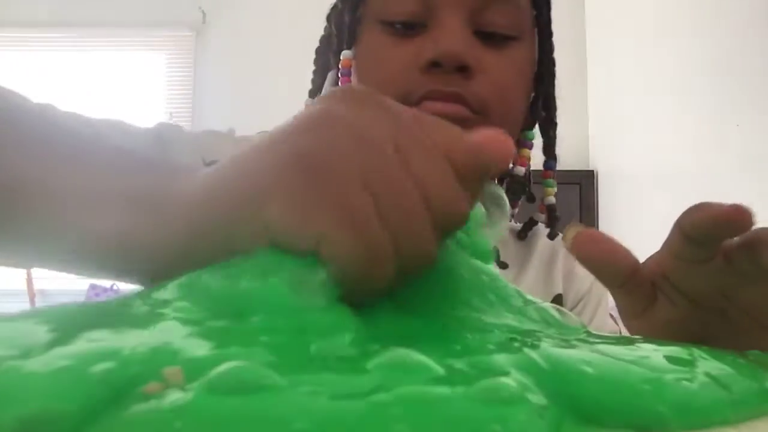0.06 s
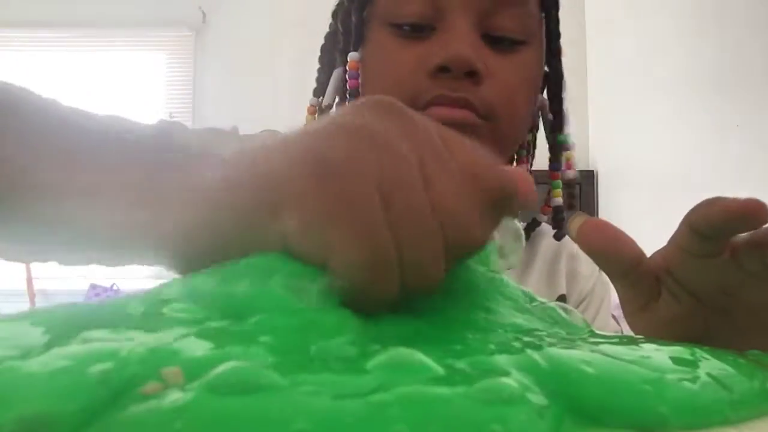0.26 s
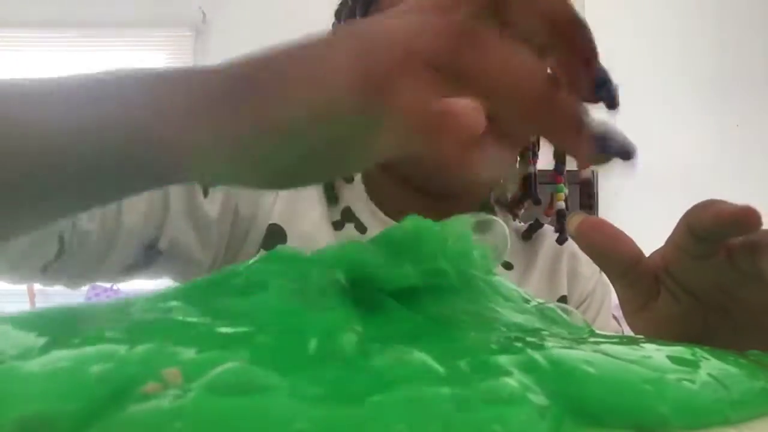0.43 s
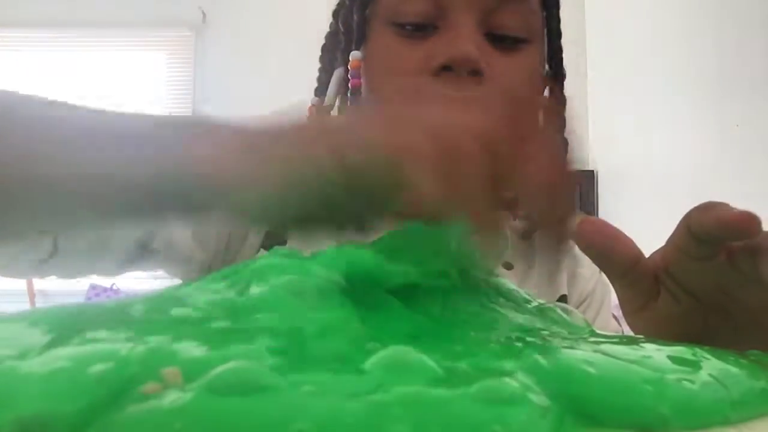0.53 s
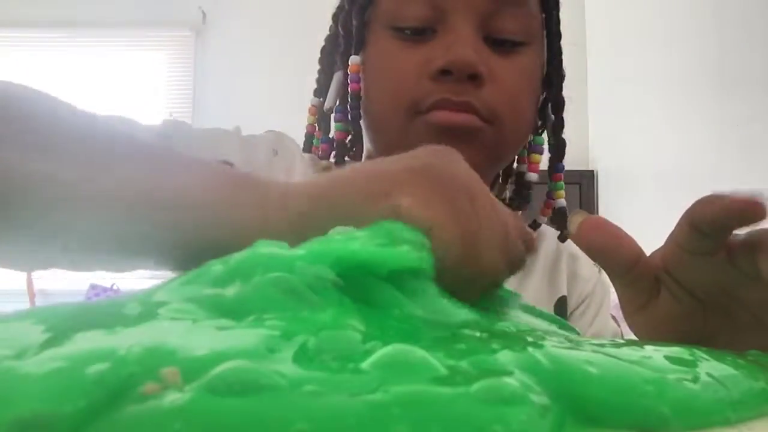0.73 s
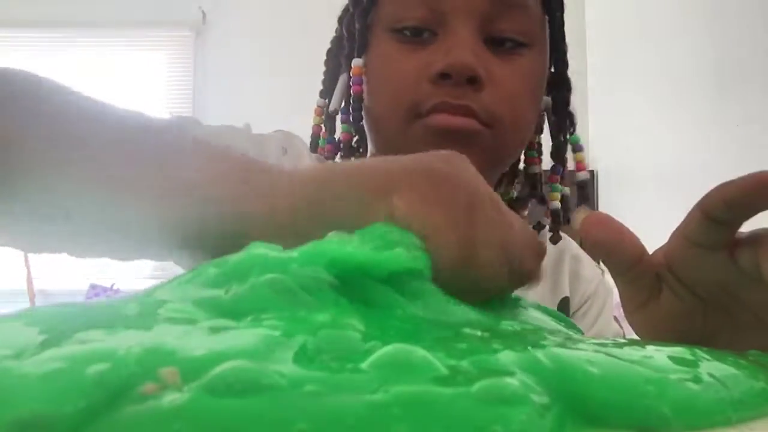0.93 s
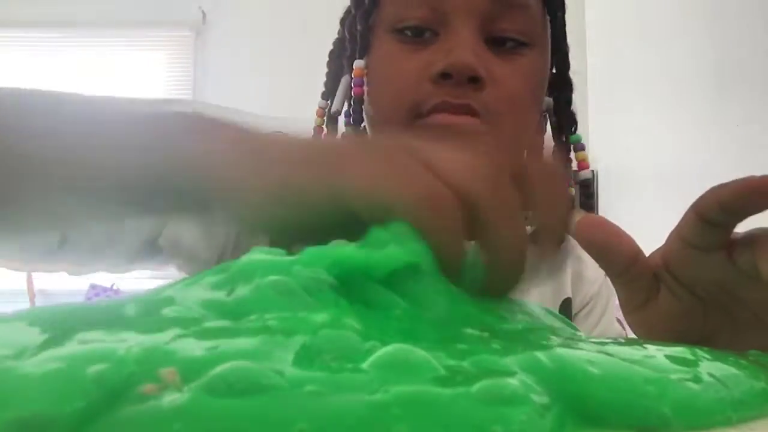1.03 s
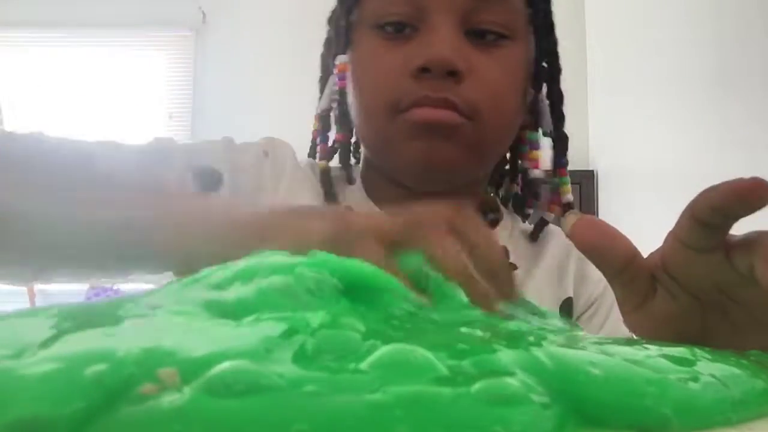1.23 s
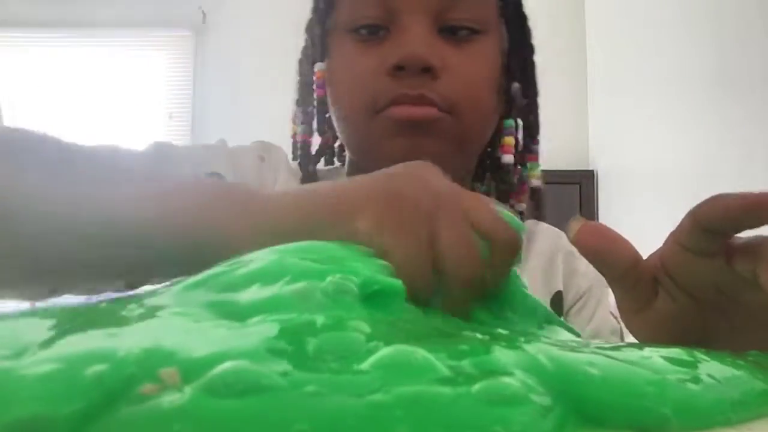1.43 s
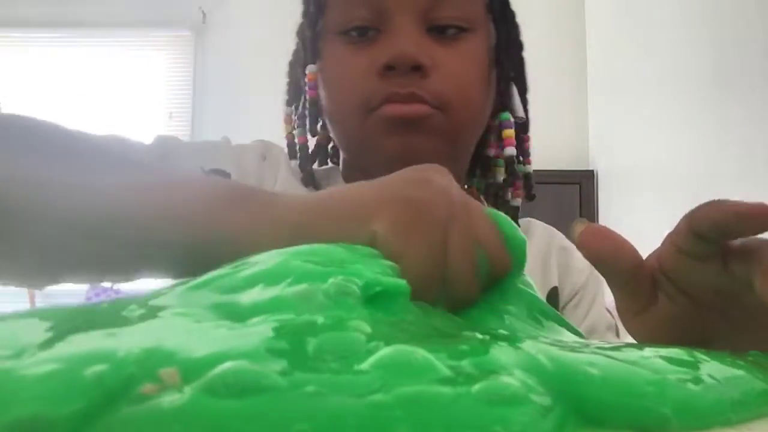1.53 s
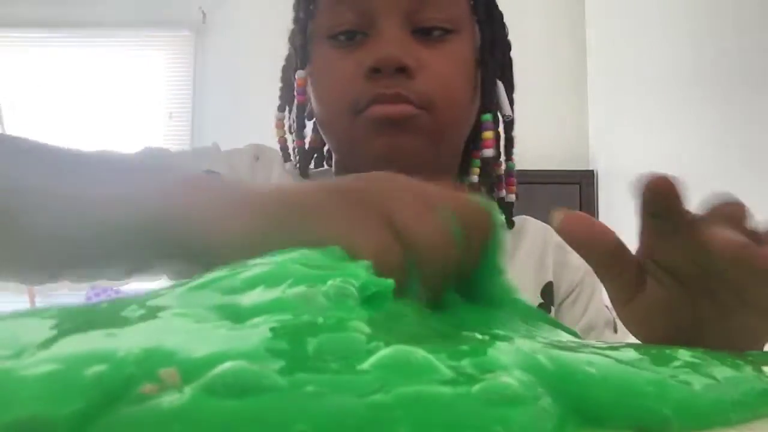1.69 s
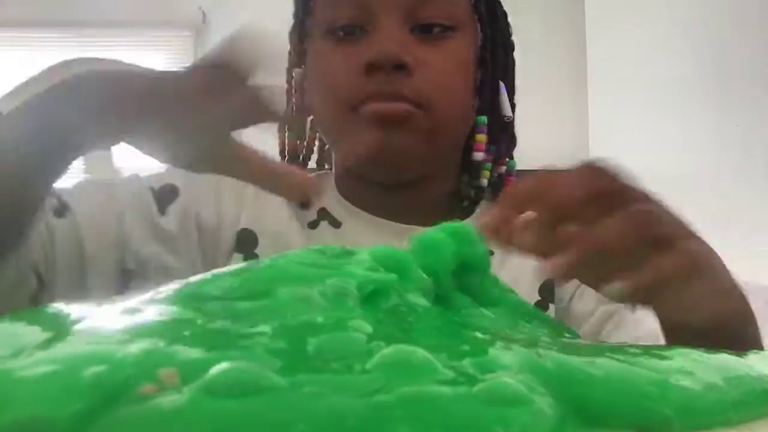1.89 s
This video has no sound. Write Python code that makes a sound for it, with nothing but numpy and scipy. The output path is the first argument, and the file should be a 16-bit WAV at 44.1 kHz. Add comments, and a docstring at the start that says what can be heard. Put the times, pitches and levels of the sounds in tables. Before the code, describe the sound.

Close to the microphone in a small room, a hand kneads thick slime; sharp wet pops come in uneven clusters, loudest early and once later, with small sticky crackles between and faint rumble and hiss behind.

```python
"""Air pockets burst in a heap of thick slime worked by a hand, close to the microphone in a small room.
Each burst is a noisy click, the skin's snap, with a brief sagging sine, the cavity's ring.
Large pockets gulp as low decaying sines, air squeaks through narrow gaps as gliding sines,
and the sticky surface crackles under the fingers as swells of tiny decaying grains.
Behind them the room answers with noise tails, over filtered-noise rumble and hiss and a wavering low hum."""
import sys
import numpy as np
from scipy import signal
from scipy.fft import rfft, irfft, next_fast_len
from scipy.io import wavfile
from scipy.ndimage import map_coordinates

SR = 44100
rng = np.random.default_rng(int(sys.argv[2]) if len(sys.argv) > 2 else 0)


def inscribe(sig):
    """Save sig as 16-bit PCM at rate SR to the path in sys.argv[1].

    A 1-D sig is mono; a 2-D sig holds one channel per row.
    Samples are clipped to [-1, 1] before scaling.
    """
    pcm = np.round(np.clip(np.atleast_2d(sig).T, -1, 1) * 32767)
    wavfile.write(sys.argv[1], SR, pcm.astype(np.int16))


N = 85995  # samples

# bursting air pockets: (time [s], cavity pitch at onset [Hz], ring level [dB], ring t60 [s],
#                        snap level [dB], snap centre [Hz], room feed [dB])
AIR_POCKETS = [ (0.1559, 3550, -21.5, 0.004, -32.5, 2900, -15),
               (0.1576, 910, -30.5, 0.019, -29.5, 1530, -6), (0.2145, 2490, -14, .016, -19, 5300, -17.5),
               (0.2162, 1260, -9.5, 0.0232, -17, 1510, -11), (0.221, 840, -9.5, 0.0088, -19.5, 1180, -10.5),
               (.2610, 2370, -1, 0.0085, -5.5, 4970, -0.5), (.2613, 920, -8, 0.016, -5, 1400, 0),
               (.2622, 3250, -7, .007, -14, 5500, -1), (0.4411, 5030, -36, 0.0012, -32, 8000, -1),
               (0.4562, 4200, -4, 0.0022, -7, 7150, -18.5), (0.4587, 2700, -8, .005, -14, 2600, -8),
               (0.46, 1520, -15.5, 0.0052, -39, 1460, -6.5), (.6930, 2200, -46, 0.0043, -47, 5000, -14),
               (0.8068, 4460, -12.5, 0.0047, -15.5, 7500, -6),
               (0.8132, 6400, -10.5, 0.0029, -30, 8000, -20),
               (0.8265, 3520, -16.5, 0.0031, -14.5, 1580, -3), (0.829, 1020, -7, 0.0051, -7.5, 2520, -9.5),
               (0.8333, 750, -16.5, 0.014, -14.5, 1440, -31), (.8457, 8000, -20, 0.0022, -23, 6060, 1.5),
               (0.9421, 3550, -8, 0.0033, -10.5, 7550, -16.5),
               (0.9429, 1400, -16, 0.0076, -10.5, 2520, -18), (0.9453, 6070, -11.5, 0.0082, -26, 4470, -20),
               (1.1234, 3490, -31, 0.0059, -30.5, 4000, 6), (1.1562, 6500, -31, .004, -45, 4500, -10),
               (1.1624, 3710, -32, 0.0083, -56, 3060, -4), (1.1732, 6230, -30, 0.015, -25.5, 3340, -30),
               (1.2067, 4500, -32.5, 0.0046, -33, 3950, -12), (1.3408, 2250, -26, 0.011, -32.5, 3800, -23),
               (1.372, 1100, -25, 0.014, -25, 2600, -18.5), (1.4543, 1000, -31, .006, -27, 3500, -10),
               (1.4542, 9500, -22, 0.0028, -16.5, 6400, -12), (1.4716, 2624, -21.5, 0.0017, -40, 3520, -23),
               (1.4831, 1900, -28.5, 0.00383, -50, 2500, -28), (1.4875, 3200, -24, 0.0039, -40, 4000, -18),
               (1.5186, 3640, -21, 0.0039, -47, 3970, -10), (1.5225, 4040, -14, 0.0037, -40.5, 4470, -21),
               (1.5439, 2500, -30, 0.0034, -32, 5000, -17), (1.575, 2070, -31.5, 0.011, -32.5, 1520, -1),
               (1.5779, 3830, -19.5, 0.0046, -23.5, 2780, -28), (1.6155, 4450, -23, 0.0035, -44, 5000, -23),
               (1.6386, 2300, -18, .018, -21.5, 3800, -2.5), (1.6420, 2250, -15.5, 0.0093, -7, 2867, -14.5),
               (1.6438, 625, -26, 0.0224, -16.5, 3700, -5.5), (1.6458, 3740, -0.5, .0017, -17, 4300, -13),
               (1.6781, 11800, -8, 0.0016, -2, 9400, -7.5),
               (1.8280, 4350, -22.5, 0.0042, -29.5, 5300, -9.5), (1.8345, 850, -40, 0.019, -34, 2030, -6),
               (1.8493, 4300, -30, .004, -36, 5000, -4), (1.8677, 3140, -32, .007, -36, 5000, -12),
               (1.8842, 1300, -38, 0.011, -39, 2030, -8), (1.8927, 4700, -28.5, 0.0035, -37.5, 3970, -14),
               (1.9185, 1380, -31, 0.011, -29, 4470, -16), (1.9360, 4300, -31.5, 0.0061, -48, 3500, -22)]
SAG_OCT = 0.31  # pitch drop over one ring
RING_RISE_CYCLES = 0.11  # time constant of the ring's onset
SPATTER_DB, SPATTER_T60_S = 0.5, 0.011  # the torn skin flutters after the snap
# harder snaps spread over a wider band: width at 0 dB and its change per dB
SNAP_WIDTH_OCT, SNAP_WIDTH_OCT_PER_DB, SNAP_SKIRT_DB = 1.1, .015, -40
POP_LOW_CUT_HZ = 270  # pockets this small radiate little bass

# dull gulps of large pockets and finger pushes: (time [s], pitch [Hz], level [dB], t60 [s])
LARGE_POCKETS = [(.221, 396, -24, 0.069), (0.462, 461, -36, 0.032), (0.829, 402, -22, 0.063),
                 (0.8314, 990, -22, 0.046), (.8335, 729, -22.5, 0.028), (1.382, 248.5, -38.5, 0.058),
                 (1.488, 463, -34, .03), (1.496, 221.8, -41.5, .06), (1.641, 552, -29, .035),
                 (1.644, 1080, -27, .025), (1.679, 85, -30, 0.073), (1.914, 250, -42.5, 0.055)]
GULP_ATTACK_S = 0.001

# air squeaking through gaps: (time [s], length [s], start pitch [Hz], end pitch [Hz], level [dB])
AIR_GAPS = [(.192, 0.0291, 1610, 1510, -39.5), (0.8361, 0.0045, 3500, 4577, -21.5),
            (0.838, 0.017, 3540, 4870, -26), (0.852, 0.0087, 5410, 6400, -25),
            (0.86, .014, 5980, 6190, -28), (0.876, 0.0062, 6900, 7700, -36.5),
            (0.967, 0.0061, 10300, 9970, -50), (0.949, 0.01, 3040, 2880, -34.5),
            (0.954, 0.0058, 10170, 8900, -35.5), (1.13, 0.02, 1770, 1316, -37)]
SQUEAK_WAVER, SQUEAK_WAVER_HZ = .03, 400  # fraction of pitch, random points per second

# sticky finger movements: (time [s], length [s], rms level [dB], centre [Hz])
FINGER_SMEARS = [(.16, 0.1, -53.5, 2470), (.465, 0.037, -42.5, 3120), (0.836, 0.059, -44, 4000),
                 (.948, .014, -38, 4940), (1.11, 0.074, -44.5, 3260), (1.316, 0.068, -54.5, 3160),
                 (1.375, 0.048, -52, 300), (1.459, 0.058, -50, 800), (1.485, .04, -50, 260),
                 (1.534, .1, -64.5, 3000), (1.646, 0.046, -43.5, 1290), (1.665, 0.026, -38.5, 3940),
                 (1.828, 0.061, -58, 4000), (1.868, .1, -49, 3300), (1.875, .075, -53, 400)]
GRAINS_PER_S, GRAIN_CYCLES = 2600, 9.2  # density, cycles per 60 dB decay
GRAIN_SPREAD_OCT, GRAIN_SCATTER_DB = 0.77, 2.8  # random spread of pitch and strength

# decay of the room's tail: (frequency [Hz], t60 [s])
ROOM_DECAY = [(200, 0.23), (1000, 0.29), (4000, 0.29), (8000, 0.31), (15000, 0.24)]
# tone of the room's answer: (frequency [Hz], level [dB])
ROOM_TONE = [(150, 6), (500, 0), (1000, 1), (2300, -6), (3300, -1.5), (4300, -2), (6300, 1), (8000, -3),
             (11000, -2.5), (15000, -2)]
ROOM_DELAY_S = .005  # before the room answers
WALL_DB, WALL_T60_S = 0.5, 0.029  # first answers of the table and near walls
RING_ROOM_DB = -6  # the cavity's ring reaches the room less than the snap
SOFT_ROOM_DB = -12  # room feed of gulps, squeaks and crackle

# relative spectrum of the room's air noise: (frequency [Hz], level [dB per Hz])
AIR_SPECTRUM = [(15, -47), (25, -9), (149, -0.5), (195, -5), (734, -19), (1070, -21.5), (1260, -22.5),
                (1740, -22.5), (2160, -25.5), (2350, -29), (2550, -24), (8360, -35.5), (16000, -46)]
# steady hum tones, before their waver: (frequency [Hz], level [dB])
HUM_TONES = [(58, -59.5), (143, -69)]
# gain of the background treble: (time [s], level [dB])
HISS_LEVEL = [(0, -4), (.12, -1), (.3, 4.5), (1.95, 11)]
AIR_DB, HISS_SPLIT_HZ = -57.5, 650  # gain of the air noise, split of rumble from hiss
HUM_WAVER_DB, HUM_WAVER_HZ = 3, 9  # random level spread, random points per second

MIC_LOW_CUT_HZ, TOP_HZ = 41, 16100


def pops():
    """A pocket's skin snaps and its cavity rings, sagging in pitch: direct sound and room feed."""
    direct, feed = np.zeros(N), np.zeros(N)
    for s, hz, ring_db, t60, snap_db, snap_hz, room_db in AIR_POCKETS:
        width_oct = max(.3, SNAP_WIDTH_OCT + SNAP_WIDTH_OCT_PER_DB * snap_db)
        click = amp(snap_db) * snap(snap_hz, width_oct)
        t = np.arange(len(click)) / SR
        sagging_hz = hz * np.exp2(-SAG_OCT * np.minimum(t / t60, 1))
        phase = 2 * np.pi * np.cumsum(sagging_hz) / SR
        rise = 1 - np.exp(-t * hz / RING_RISE_CYCLES)
        ring = np.sin(phase) * fade(t, t60) * rise
        add(direct, s, amp(ring_db) * ring + click)
        add(feed, s, amp(room_db) * (amp(ring_db + RING_ROOM_DB) * ring + click))
    return signal.lfilter(*signal.butter(2, POP_LOW_CUT_HZ, 'highpass', fs=SR), [direct, feed])


def snap(centre_hz, width_oct, size=1024):
    """A tearing skin gives one causal broadband click of peak 1, plus a short noisy spatter."""
    octaves = np.log2((np.fft.rfftfreq(size, 1 / SR) + 1) / centre_hz)
    band = np.exp(-.5 * (octaves / width_oct) ** 2)
    skirt = amp(SNAP_SKIRT_DB) / (1 + np.exp2(2 * octaves))
    # folding the cepstrum gives minimum phase: all the energy follows the onset
    cepstrum = irfft(np.log(band + skirt))
    cepstrum[1:size // 2] *= 2
    cepstrum[size // 2:] = 0
    click = irfft(np.exp(rfft(cepstrum)))
    click = click / abs(click).max()
    flutter = rng.standard_normal(size) * fade(np.arange(size) / SR, SPATTER_T60_S)
    spatter = signal.fftconvolve(click, flutter / np.linalg.norm(flutter))[:size]
    return click + amp(SPATTER_DB) * spatter


def gulps():
    """Large pockets give way with a soft, decaying note, mostly low."""
    out, t = np.zeros(N), np.arange(SR // 5) / SR
    for s, hz, db, t60 in LARGE_POCKETS:
        attack = 1 - np.exp(-t / GULP_ATTACK_S)
        add(out, s, amp(db) * np.sin(2 * np.pi * hz * t) * fade(t, t60) * attack)
    return out


def squeaks():
    """Escaping air whistles in short, unsteady glides."""
    out = np.zeros(N)
    for s, length, start_hz, end_hz, db in AIR_GAPS:
        progress = np.linspace(0, 1, round(length * SR))
        waver = smooth_random(progress * length * SQUEAK_WAVER_HZ)
        hz = start_hz * (end_hz / start_hz) ** progress * (1 + SQUEAK_WAVER * waver)
        swell = np.sin(np.pi * progress)
        add(out, s, amp(db) * swell * np.sin(2 * np.pi * np.cumsum(hz) / SR))
    return out


def crackle(size=400):
    """Tiny bubbles break as short decaying sines, in a swell under each finger movement."""
    out, t = np.zeros(N), np.arange(size) / SR
    for s, length, db, centre_hz in FINGER_SMEARS:
        count = min(size, max(2, round(length * GRAINS_PER_S)))
        place = rng.random(size)[:count, None]  # 0 to 1 along the movement
        pitch = rng.standard_normal(size)[:count, None]
        strength = rng.exponential(size=size)[:count, None]
        hz = np.minimum(centre_hz * np.exp2(GRAIN_SPREAD_OCT * pitch), TOP_HZ)
        level = amp(GRAIN_SCATTER_DB * np.minimum(strength, 4)) * np.sin(np.pi * place)
        envelope = fade(t, GRAIN_CYCLES / hz) * np.minimum(t * hz, 1)
        grains = level * np.sin(2 * np.pi * hz * t) * envelope
        at = (place * length * SR).astype(int) + np.arange(size)
        summed = np.bincount(at.ravel(), grains.ravel())
        add(out, s, amp(db) * unit(summed))
    return out


def room(x, count=6):
    """Near walls' quick decay over a longer, frequency-dependent noise tail, drawn anew per stretch."""
    hz, t, noise = signal.stft(rng.standard_normal((count, SR // 3)), SR, nperseg=256)
    shape = fade(t, along(ROOM_DECAY, hz)[:, None]) + amp(WALL_DB) * fade(t, WALL_T60_S)
    shape *= amp(along(ROOM_TONE, hz))[:, None] / np.sqrt(np.mean(shape ** 2) * (SR // 3))
    tails = signal.istft(noise * shape, SR, nperseg=256)[1]
    out, step = np.zeros(N), N // count + 1
    for k, tail in enumerate(tails):  # each equal stretch of time has its own noise tail
        answer = signal.fftconvolve(x[k * step:][:step], tail)
        add(out, k * step / SR + ROOM_DELAY_S, answer)
    return out


def background():
    """The distant bed: shaped noise split into rumble and hiss, with slowly wavering hum tones."""
    t = np.arange(N) / SR
    air = unit(filtered(rng.standard_normal(N), lambda hz: amp(along(AIR_SPECTRUM, hz))))
    rumble = filtered(air, lambda hz: 1 / (1 + (hz / HISS_SPLIT_HZ) ** 2))
    hiss = (air - rumble) * amp(np.interp(t, *np.transpose(HISS_LEVEL)))
    hum = np.zeros(N)
    for hz, db in HUM_TONES:
        level = amp(db + HUM_WAVER_DB * smooth_random(t * HUM_WAVER_HZ))
        phase_waver = .5 * smooth_random(t * HUM_WAVER_HZ)  # radians
        hum += level * np.sin(2 * np.pi * hz * t + phase_waver)
    return amp(AIR_DB) * (rumble + hiss) + hum


def amp(db):
    """Decibels to gain."""
    return 10 ** (np.asarray(db) / 20)


def unit(x):
    """Scale to rms 1."""
    return x / np.sqrt(np.mean(x ** 2) + 1e-20)


def along(points, hz):
    """Read (frequency [Hz], value) points on a log frequency axis."""
    f, v = np.transpose(points)
    return np.interp(np.log(hz + 1), np.log(f + 1), v)


def fade(t, t60):
    """Exponential decay, 60 dB in t60."""
    return np.exp(-np.log(1000) * t / t60)


def smooth_random(position):
    """Smooth curve through 64 random points, read at the given positions."""
    return map_coordinates(rng.standard_normal(size=64), [position])


def add(track, s, x):
    """Mix x into the track at time s."""
    part = track[max(0, round(s * SR)):][:len(x)]
    part += x[:len(part)]


def filtered(x, response):
    """Multiply the spectrum of x by a response of frequency."""
    m = next_fast_len(len(x) + SR // 4)
    return irfft(rfft(x, m) * response(np.fft.rfftfreq(m, 1 / SR)), m)[:len(x)]


def scene():
    """Close pops over the softer sounds of kneading, with the room's answer and background."""
    soft = gulps() + squeaks() + crackle()
    direct, feed = pops()
    wet = room(feed + amp(SOFT_ROOM_DB) * soft)
    return (direct + soft + wet + background())[None]


def record(dry):
    """The microphone path drops the deepest bass and cuts steeply above its band limit."""
    x = signal.lfilter(*signal.butter(2, MIC_LOW_CUT_HZ, 'highpass', fs=SR), dry[0])
    return filtered(x, lambda hz: 1 / (1 + (hz / TOP_HZ) ** 100))[None]


dry = scene()
out = record(dry)
inscribe(out)
```